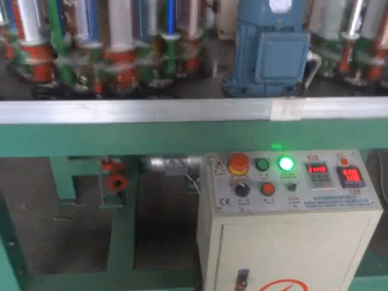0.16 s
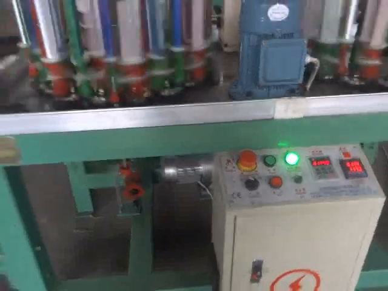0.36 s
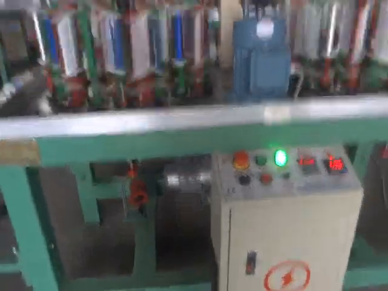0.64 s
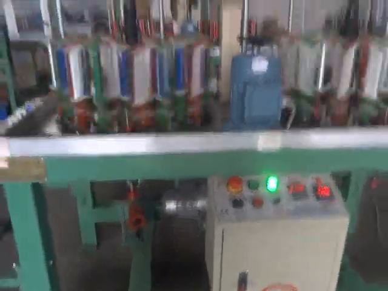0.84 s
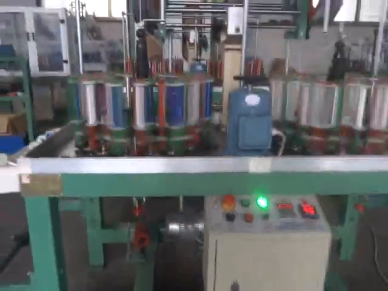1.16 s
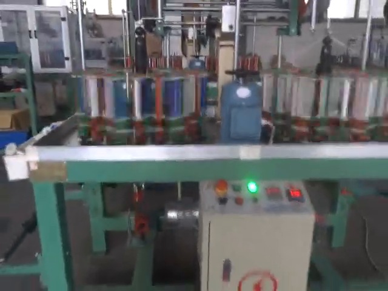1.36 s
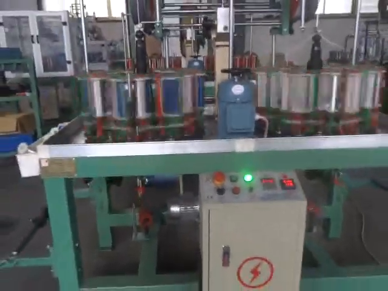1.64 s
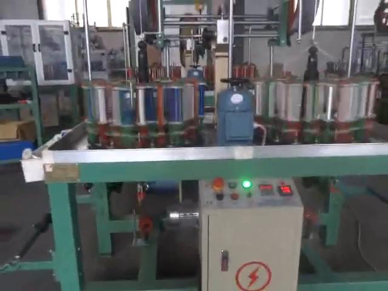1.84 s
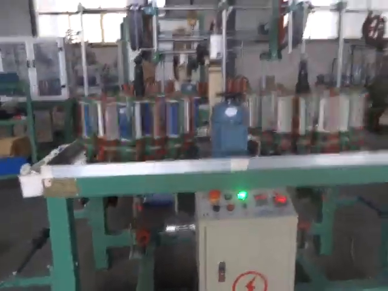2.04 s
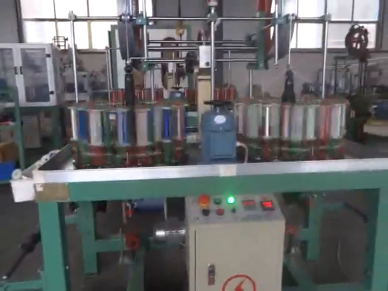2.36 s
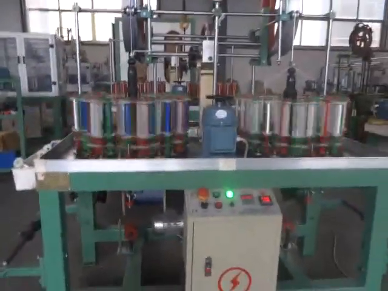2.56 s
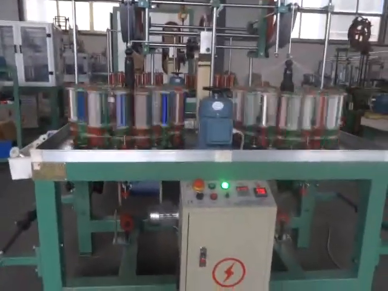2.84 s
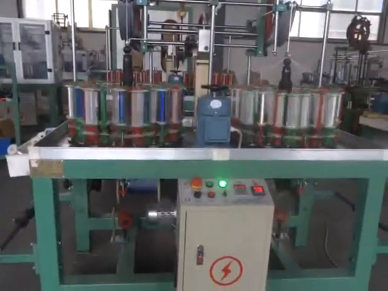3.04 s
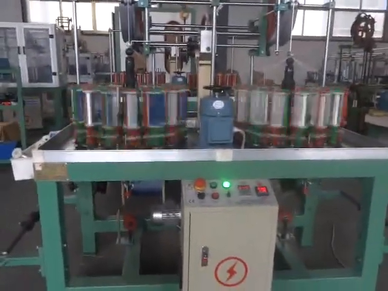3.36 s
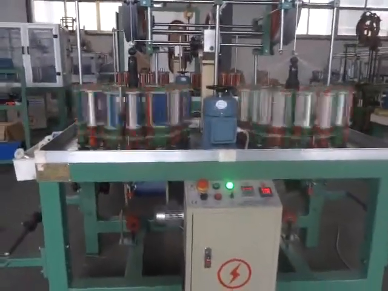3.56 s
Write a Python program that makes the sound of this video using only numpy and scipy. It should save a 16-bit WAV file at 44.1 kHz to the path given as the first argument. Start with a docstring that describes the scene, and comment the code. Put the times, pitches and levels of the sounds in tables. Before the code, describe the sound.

A braiding machine runs at full speed in a large workshop. After a blink of silence, its roar cuts in at 0.06 s and swells until about 0.3 s: countless bobbin-carrier knocks fused together, with metallic ringing, low deck thumps, faint wavering gear whine and a close rattle. Around 0.4-1.1 s the microphone backs away; the rattle fades by about 2.5 s, and the steady, thin-bassed roar centres and dulls until 3.67 s.

```python
"""A braiding machine at full speed in a large workshop. After a blink of silence the sound opens abruptly,
leaning slightly to the right, and fades up: knocks of bobbin carriers, so thick that they fuse into a roar
coloured by the steel deck, with low thumps, a faint gear whine and a near rattle, all made from random
clicks or filtered noise. The hall adds a smooth wash of noise. The listener then backs away: the deck and
gears change their balance, the rattle dies out, the sound centres and on the whole grows duller."""
import sys
import numpy as np
from scipy import signal
from scipy.io import wavfile

SR = 44100
rng = np.random.default_rng(int(sys.argv[2]) if len(sys.argv) > 2 else 0)


def wav_out(sig):
    """Save sig, one row per channel (or a flat mono array), as 16-bit PCM at SR to the path in sys.argv[1]."""
    wavfile.write(sys.argv[1], SR, np.round(np.clip(np.atleast_2d(sig).T, -1, 1) * 32767).astype(np.int16))


def invert_db(level):
    """Linear amplitude ratio for a level in decibels (20 dB per decade), elementwise."""
    return 10 ** (np.asarray(level, dtype=float) / 20)


N = 162729  # length in samples

# How loud and how bright the scene is over time, ahead of the microphone's bass cut:
# start_s, level_db, tilt_db_per_octave (around 2000 Hz)
LOUDNESS = [(0.07, -21.5, 0), (0.12, -20, 0), (0.2, -18.5, 0), (0.32, -16, -0.45), (0.6, -16, -0.32),
            (1.0, -15.5, -0.6), (1.5, -15.5, -0.63), (2.1, -15.5, -0.8), (2.8, -15, -1), (3.3, -15, -0.9),
            (3.67, -15, -1)]
# Basic colour of the carriers' clatter: pitch_hz, level_db_per_hz
CLATTER_COLOUR = [(20, 2), (50, -10), (100, -16.5), (160, -13), (250, -9.5), (330, -8.5), (480, -6),
                  (745, -0.5), (907, -4), (1500, -4.5), (2380, -3.5), (2690, -3), (3440, -3), (5000, -4.5),
                  (8000, -5.5), (10200, -7)]
# Resonances of deck and carriers: pitch_hz, width_hz, near_boost_db, far_boost_db
DECK_RESONANCES = [(140, 27, -4, -2), (245, 18, 5.5, 4), (350, 26, -4, -3.5), (366, 18, 3.5, 4.5),
                   (580, 62, 3.5, 1), (910, 71, 1.5, -3.5), (1140, 190, -0.5, 2.5), (1940, 140, -0.5, 2),
                   (2375, 105, 3, 1.5), (2770, 130, -5, -2), (3320, 270, 2, 1), (3480, 140, -1, 1.5),
                   (4120, 140, -0.5, 1.5), (4600, 130, 1.5, 2.5), (4820, 200, -4.5, -3.5),
                   (6100, 4300, 2, 1.5), (11150, 1800, 3, 3)]
# Wavering gear tones: pitch_hz, width_hz (of each filter pass), near_level_db, far_level_db (against the roar)
GEAR_TONES = [(203, 3.6, -37.5, -39), (269, 11, -41, -33.5), (2403, 24, -29, -24), (3396, 60, -29, -29),
              (3500, 60, -23, -26)]
# Colour of the sound from the sides of the hall: pitch_hz, level_db_per_hz
HALL_COLOUR = [(30, -9), (65, -21), (130, -18), (257, -9.5), (500, -3.5), (745, 0.5), (930, -0.5),
               (2000, -0.5), (4410, 0.5), (7000, -1), (10200, -4.5)]
# Ringing of the deck plate under heavier knocks: pitch_hz
THUMP_PITCHES = [653, 717, 758, 796]

OPENS_S = 0.0596
STEP_BACK_S, STEP_LENGTH_S = 0.73, 0.33  # middle and spread of the move away
LEAN_DB, LEAN_FADE_S = -0.3, 1.5  # left against right at time zero, and how slowly it centres
HALL_DB, HALL_PATCH_DB = -15, 0.6  # level against the roar; flicker of each band
RATTLE_HZ, RATTLE_WIDTH_HZ, RATTLE_PER_S = 3300, 210, 60
RATTLE_DB, RATTLE_FADE_S = -19, 1.06  # level before its fade
THUMPS_PER_S, THUMP_WIDTH_HZ, THUMP_DB = 45, 38, -21.5  # thumps of all pitches together
KNOCKS_PER_S, KNOCK_SPREAD_DB = 9000, 2  # rate in each of three trains; unevenness of every kind of knock
RINGS_PER_S, RING_T60_S, RING_DB = 700, 0.061, -3.5  # time to fall by 60 dB; level against the knocks
RING_LOW_HZ, RING_HIGH_HZ = 605, 10766
SURGE_DB, SURGE_PER_S = 0.17, 3.9  # all carriers together
PATCH_DB, PATCH_PER_S = 0.46, 23  # each band alone; the hall shares this rate
LUMP_DB, LUMP_PER_S, LUMP_BELOW_HZ = 2, 11, 290  # the rumble comes in lumps
TILT_ABOVE_HZ = 120  # the deep rumble fills the hall and is left out of the tilt
BASS_CUT_HZ, TREBLE_CUT_HZ = 202, 11010


def at_hz(points, hz):
    """Reads a spectrum between its points, on a log-frequency axis."""
    points_hz, points_db = np.transpose(points)
    return np.interp(np.log(hz), np.log(points_hz), points_db)


def rms_one(x):
    """Scales a sound to rms 1."""
    return x / np.sqrt(np.mean(x ** 2) + 1e-20)


def drift(rate):
    """Slow random wandering of spread 1: noise smoothed at one point per 40 samples, then joined by lines."""
    r = np.exp(-80 * np.pi * rate / SR)
    noise = rng.standard_normal(N // 40 + 2002)
    slow = signal.lfilter([1], [1, -2 * r, r * r], noise)[2000:]  # leave out the filter's start
    return np.interp(np.arange(N) / 40, np.arange(len(slow)), rms_one(slow))


def resonance(x, hz, width):
    """A part that rings at one pitch: a band-pass of gain 1 at its peak."""
    r = np.exp(-np.pi * width / SR)
    feedback = [1, -2 * r * np.cos(2 * np.pi * hz / SR), r * r]
    return signal.lfilter([(1 - r * r) / 2, 0, (r * r - 1) / 2], feedback, x)


def coloured(sources, spectrum, patchy_db, tilt_db):
    """Third-octave bands, taking the sources in turn, each with its own level and flicker."""
    out = 0
    edges = 16 * 2 ** (np.arange(31) / 3)
    for k, (low, high) in enumerate(zip(edges, edges[1:])):
        hz = min(np.sqrt(low * high), 1e4)
        band_filter = signal.butter(2, [low, high], "band", fs=SR, output="sos")
        band = signal.sosfilt(band_filter, sources[k % len(sources)])
        octaves = np.log2(hz / 2000) if hz > TILT_ABOVE_HZ else 0
        level_db = at_hz(spectrum, hz) + tilt_db * octaves + patchy_db * drift(PATCH_PER_S)
        out = out + invert_db(level_db) * band
    return out


def stepped_back():
    """Moves smoothly from 0 close to the machine to 1 after the listener has backed away."""
    t = np.arange(N) / SR
    return 0.5 + 0.5 * np.tanh((t - STEP_BACK_S) / STEP_LENGTH_S)


def knocks(rate, count):
    """Trains of clicks at random moments, of random sign and uneven size."""
    shape = (count, N)
    sizes = invert_db(KNOCK_SPREAD_DB * np.minimum(rng.exponential(1, shape), 3.0))
    return (rng.random(shape) < rate / SR) * rng.choice([-1, 1], shape) * sizes


def hall(tilt_db):
    """Smooth late echoes, made as coloured noise of opposite sign in the two channels."""
    wash = coloured(rng.standard_normal((2, N)), HALL_COLOUR, HALL_PATCH_DB, tilt_db)
    return invert_db(HALL_DB) * rms_one(wash) * [[1], [-1]]


def rattle():
    """A part close by rings in a narrow band at each knock and is lost as the listener backs away."""
    hits = knocks(RATTLE_PER_S, count=1)[0]
    ring = resonance(hits, RATTLE_HZ, RATTLE_WIDTH_HZ)
    ring = resonance(ring, RATTLE_HZ, RATTLE_WIDTH_HZ)
    t = np.arange(N) / SR
    return invert_db(RATTLE_DB) * rms_one(ring) * np.exp(-(t / RATTLE_FADE_S) ** 2 / 2)


def thumps():
    """Heavier knocks ring in the deck plate, each pitch struck by knocks of its own."""
    count = len(THUMP_PITCHES)
    hits = knocks(THUMPS_PER_S / count, count) + 1e-18  # the tiny offset keeps the filters fast
    total = 0
    for train, hz in zip(hits, THUMP_PITCHES):
        ring = resonance(train, hz, THUMP_WIDTH_HZ)
        total = total + resonance(ring, hz, 3 * THUMP_WIDTH_HZ)
    return invert_db(THUMP_DB) * rms_one(total)


def gears():
    """Gear whine as narrow bands of noise: tones that waver in height and strength."""
    back = stepped_back()
    total = 0
    for hz, width, near_db, far_db in GEAR_TONES:
        tone = resonance(rng.standard_normal(N), hz, width)
        tone = rms_one(resonance(tone, hz, width))
        total = total + invert_db(near_db + (far_db - near_db) * back) * tone
    return total


def rings(count):
    """Loose parts ring on: each harder knock strikes one of many small metal parts."""
    hits = knocks(RINGS_PER_S, count=1)[0]
    # higher parts are struck more often
    chances = np.arange(count, 3 * count, 2) / (count * (2 * count - 1))
    struck_part = rng.choice(count, N, p=chances)
    pitches = np.geomspace(RING_LOW_HZ, RING_HIGH_HZ, count) * rng.uniform(0.995, 1.005, count)
    width = np.log(1000) / (np.pi * RING_T60_S)
    total = 0
    for k, hz in enumerate(pitches):
        own_hits = hits * (struck_part == k) + 1e-18
        total = total + np.sqrt(hz) * resonance(own_hits, hz, width)
    return rms_one(total)


def carriers(tilt_db):
    """Dense knocks and ringing parts fuse into a roar, which the deck's resonances colour."""
    contacts = rms_one(knocks(KNOCKS_PER_S, count=3)) + invert_db(RING_DB) * rings(count=180)
    roar = coloured(contacts, CLATTER_COLOUR, PATCH_DB, tilt_db)
    back = stepped_back()
    for hz, width, near_db, far_db in DECK_RESONANCES:
        boost = invert_db(near_db + (far_db - near_db) * back)
        roar = roar + (boost - 1) * resonance(roar, hz, width)
    rumble = signal.sosfilt(signal.butter(2, LUMP_BELOW_HZ, fs=SR, output="sos"), roar)
    roar = roar + rumble * (invert_db(LUMP_DB * drift(LUMP_PER_S)) - 1)
    return rms_one(roar) * invert_db(SURGE_DB * drift(SURGE_PER_S))


def scene():
    """Machine in front, hall around; loudness and tilt change as the listener backs away."""
    t = np.arange(N) / SR
    start_s, level_db, tilt_db = np.transpose(LOUDNESS)
    level_db = np.interp(t, start_s, level_db)
    tilt_db = np.interp(t, start_s, tilt_db)
    lean = invert_db(LEAN_DB / 2 * np.exp(-t / LEAN_FADE_S) * [[1], [-1]])  # left, right
    machine = rattle() + thumps() + gears() + carriers(tilt_db)
    return invert_db(level_db) * (hall(tilt_db) + machine * lean)


def roll_off(x):
    """The treble ends steeply here."""
    return signal.sosfilt(signal.butter(12, 11950, fs=SR, output="sos"), x)


def record(dry):
    """The microphone is weak in the bass and opens at once; the treble is cut sharply."""
    thin = signal.sosfilt(signal.butter(2, BASS_CUT_HZ, "high", fs=SR, output="sos"), dry)
    opened = thin * (np.arange(N) / SR > OPENS_S)
    treble_cut = signal.ellip(20, 0.1, 100, TREBLE_CUT_HZ, fs=SR, output="sos")
    mix = signal.sosfilt(treble_cut, opened)
    return roll_off(mix)


dry = scene()
out = record(dry)
wav_out(out)
```